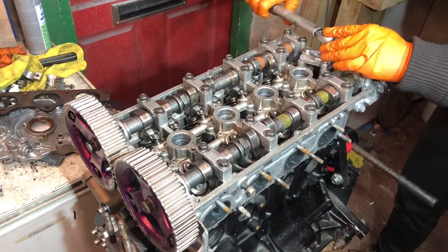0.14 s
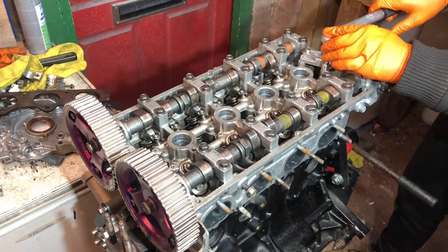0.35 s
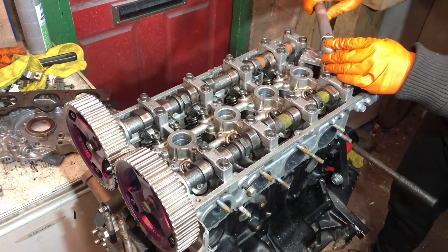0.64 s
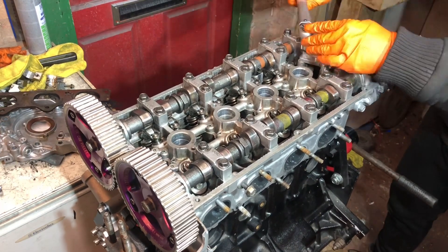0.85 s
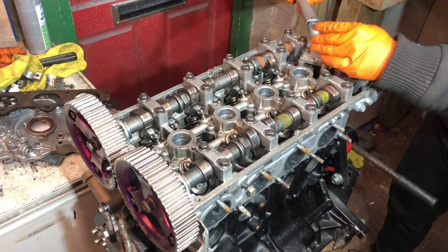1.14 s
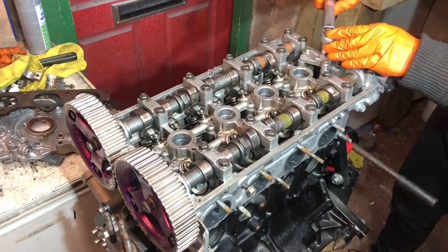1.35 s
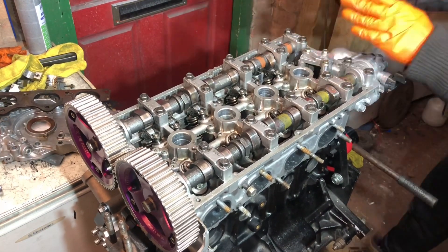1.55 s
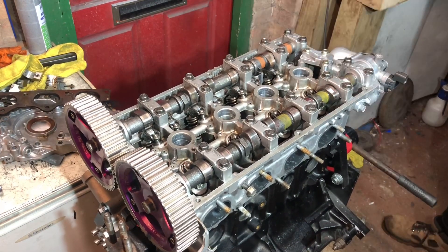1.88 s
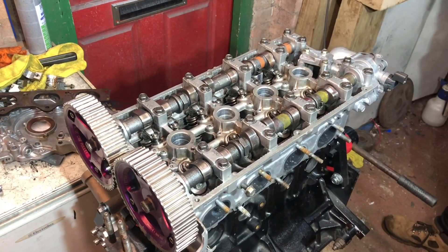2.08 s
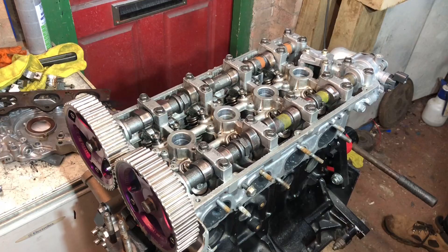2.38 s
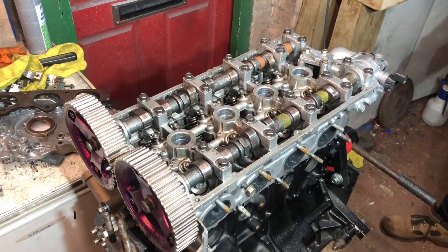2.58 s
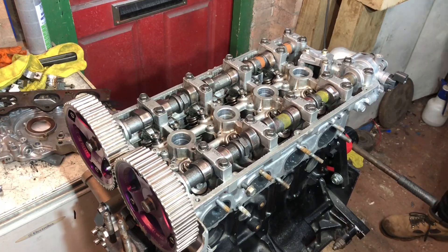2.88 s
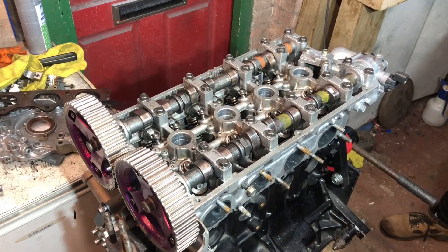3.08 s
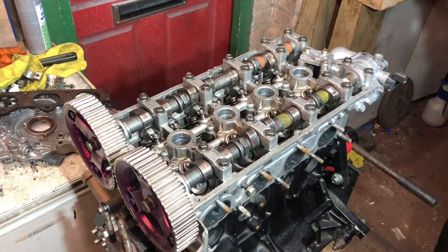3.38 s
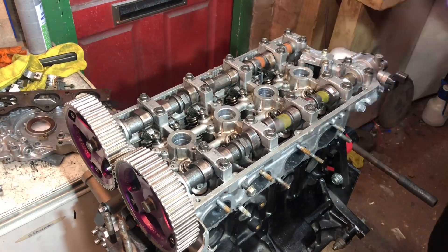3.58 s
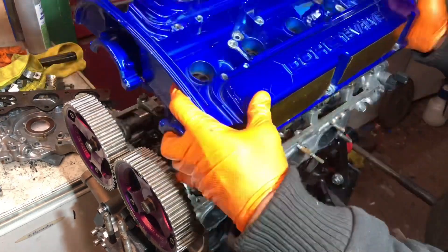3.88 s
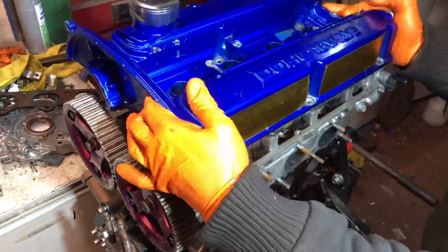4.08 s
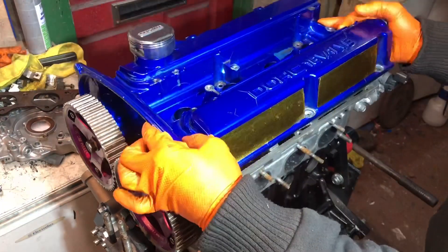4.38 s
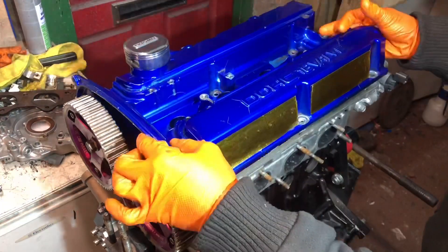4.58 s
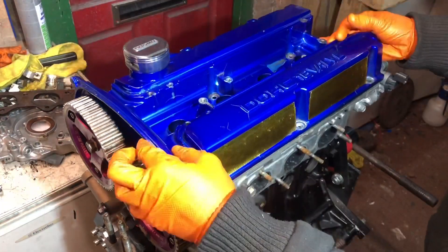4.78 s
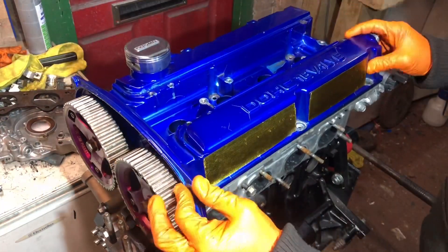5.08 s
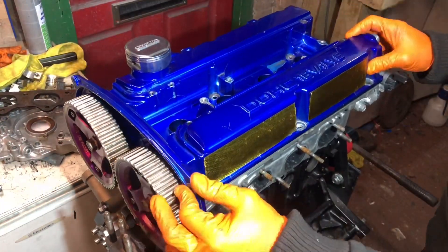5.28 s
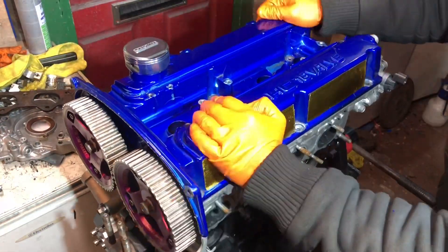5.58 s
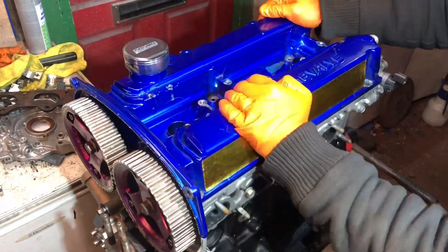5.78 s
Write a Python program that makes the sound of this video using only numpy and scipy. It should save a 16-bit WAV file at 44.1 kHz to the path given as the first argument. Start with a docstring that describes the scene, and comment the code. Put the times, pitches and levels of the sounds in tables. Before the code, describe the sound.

Close mono pickup in a small cluttered workshop. A ratchet wrench clicks in light pairs, then is laid down with a bright steel clink; other tools knock and scrape briefly on wood. Sleeves and rubber gloves rustle, and a hollow aluminium cover lands on the engine with a loud clack and quick rocking rattles. Faint rubs and soft dull taps follow over low hum.

```python
"""Wrench and cam cover in a small workshop

A wrench ticks on the bolts of a cylinder head, is laid down with a clink, and other tools are pushed aside.
Sleeves and rubber gloves rustle as a cast aluminium cam cover is picked up; it clacks onto the head, rocks
and is nudged home with dull knocks. Behind it all is a faint steady room noise with a low hum.
Blows are short cracks plus fading tones; rubbing, dragging and room noise are random noise given a colour.
"""
import sys
import numpy as np
from scipy import signal
from scipy.fft import rfft, irfft, next_fast_len
from scipy.io import wavfile

SR = 44100
rng = np.random.default_rng(int(sys.argv[2]) if len(sys.argv) > 2 else 0)


def master_out(mix):
    """Clip the mix to full scale and print it as 16-bit PCM to the path in sys.argv[1]."""
    frames = np.transpose(np.atleast_2d(mix))
    ceiling = np.clip(frames, -1, 1)
    pcm = np.round(ceiling * 32767).astype(np.int16)
    wavfile.write(sys.argv[1], SR, pcm)


N = 261954
TAIL = np.arange(2 ** 13) / SR   # time axis of every blow and of the room's tail, in seconds

# Back swings of the ratchet, two pawl clicks each: start_s, gap_to_second_click_s, level_db
RATCHET_SWINGS = [(.292, .056, -43.5), (0.6756, 0.047, -42.5), (1.0327, .0431, -46), (1.4101, 0.041, -43.5)]
PAWL_TILT = 0.13   # dB per octave
PAWL_RING_DB, SECOND_RING_DB = -5.5, -9.5   # ring of the handle on the first and second click
SETTLE_S, SETTLE_DB = 0.035, -10.5   # the pawl settles after the second click, at a level against it
# The socket jolts on the bolt as the hand turns round: start_s, level_db, brightness_db_per_octave
SOCKET_JOLTS = [(0.0509, -43, -0.5), (.063, -41, 0.3), (.473, -44, 0), (.535, -51, 4), (.5531, -45.5, 7.5),
                (0.8265, -44, 3.5), (.908, -37.5, 3.5), (1.1731, -45, 1.5), (1.3114, -45, -0.7),
                (1.575, -51.5, 1.5)]
JOLT_RING_DB = -27.5
REBOUND_S, REBOUND_DB = 0.019, -16.5   # each jolt rebounds once: delay, and level against the jolt
# A quick zip of thin ticks, the ratchet running or a glove rubbing:
# start, spacing, level, brightness in dB per octave
ZIP_S, ZIP_STEP_S, ZIP_DB, ZIP_TILT = 1.664, 0.0097, -46.5, 12


def wrench_ticks(count=4):
    """Every tick, the zip's included, as (start_s, level_db, brightness_db_per_octave, handle_ring_db)."""
    ticks = [(ZIP_S + k * ZIP_STEP_S, ZIP_DB, ZIP_TILT, JOLT_RING_DB) for k in range(count)]
    for start_s, gap_s, db in RATCHET_SWINGS:
        second_s = start_s + gap_s
        ticks.append((start_s, db, PAWL_TILT, PAWL_RING_DB))
        ticks.append((second_s, db, PAWL_TILT, SECOND_RING_DB))
        ticks.append((second_s + SETTLE_S, db + SETTLE_DB, PAWL_TILT, JOLT_RING_DB))
    for start_s, db, tilt in SOCKET_JOLTS:
        ticks.append((start_s, db, tilt, JOLT_RING_DB))
        ticks.append((start_s + REBOUND_S, db + REBOUND_DB, tilt, JOLT_RING_DB))
    return ticks


# Ringing tones of the wrench, levels against each other: pitch_hz, level_db, time_to_fall_60_db_s
WRENCH_TONES = [(1496, 8, 0.054), (1527, -2.5, 0.067), (2028, 6.5, 0.038), (2260, -4, 0.066),
                (4820, -2.5, 0.023), (6630, -12, 0.036), (8400, -19, 0.052), (11100, 4.5, .04)]
# Colour of the wrench's contacts and dense higher tones: pitch_hz, relative_level_db_per_hz
WRENCH_COLOUR = [(70, -30), (250, -9), (750, -8), (1400, -5), (2800, -9), (4000, -7), (5000, -2),
                 (6500, -4), (8500, -1), (10500, 4), (13000, 0), (16000, -1)]
# Colour of the hands' handling noise: pitch_hz, relative_level_db_per_hz
HANDS_COLOUR = [(40, -16), (120, 3.5), (260, 2.5), (900, -2), (2500, -18.5), (16000, -39)]
# Dull bump of the hands at every jolt: level against the jolt, dB per octave, contact in seconds
BUMP_DB, BUMP_TILT, BUMP_CONTACT_S = -18, -5.5, 0.0093
WORK_START_S, WORK_END_S = 0.0, 1.7


def wrench():
    """Small bright ticks of the wrench on the bolts, over the dull bumping of the hands that work it."""
    out = np.zeros(N)
    for start_s, db, tilt, ring_db in wrench_ticks():
        crack = knock(WRENCH_COLOUR, tilt, crack_db=-8, t60=0.065, damping=0.13)
        tick = crack + from_db(ring_db) * ring(WRENCH_TONES)
        add(out, start_s, db, grate(tick, contact_s=0.000062))
    for start_s, db, _ in SOCKET_JOLTS:
        bump = knock(TOOL_COLOUR, BUMP_TILT, crack_db=-8.5, t60=0.13, damping=0.46)
        add(out, start_s, db + BUMP_DB, grate(bump, BUMP_CONTACT_S))
    # the level of the handling wanders quickly
    effort = movement(WORK_START_S, WORK_END_S) * from_db(-76.5 + 5.3 * drift(30.5))
    handling = steady(colour(rng.standard_normal(N), HANDS_COLOUR)) * effort
    return from_db(1.56) * in_room(out + handling, wet_db=-19.5)


# Ringing tones of the steel tools, levels against each other: pitch_hz, level_db, time_to_fall_60_db_s
STEEL_TONES = [(4620, 12.5, 0.045), (5440, 4, 0.022), (6130, 4, 0.043), (6800, -14, 0.098),
               (8700, -14, 0.051), (9080, 2.5, 0.13), (10600, -28, 0.018), (13650, 3, 0.079)]
# Hollow, woody ring of the knocks, levels against each other: pitch_hz, level_db, time_to_fall_60_db_s
BOARD_TONES = [(576, -7.5, .08), (703, -1, 0.098), (789, -1.5, 0.044), (966, -2, 0.11), (1042, -3.5, 0.06),
               (1196, -3, 0.066), (1470, 1, 0.092), (2163, -5.5, 0.064), (2940, -2.5, 0.056),
               (3122, -1, 0.061)]
# Colour of the dull contacts and dense higher tones: pitch_hz, relative_level_db_per_hz
TOOL_COLOUR = [(70, -40), (130, -23), (240, -7), (380, -10), (520, -5), (800, -1), (1400, 0), (2200, -4),
               (3100, -2), (4200, -6), (6300, -6), (10000, -11), (16000, -21)]


def dull_blow(tilt, steel_db, board_db, contact_s):
    """One contact: a dull knock with a steely ring and a hollow, woody one."""
    rings = from_db(steel_db) * ring(STEEL_TONES) + from_db(board_db) * ring(BOARD_TONES)
    dull_knock = knock(TOOL_COLOUR, tilt, crack_db=-4.5, t60=0.072, damping=0.21)
    return grate(dull_knock + rings, contact_s)


# Steel meets steel: start_s, level_db, brightness_db_per_octave, contact_s
STEEL_CLINKS = [(1.861, -26.5, 7.5, 0.00054), (2.047, -39, -1, 0.008), (2.495, -49, 1, .01),
                (2.6795, -34.5, 2, 0.0045)]
# Dull knocks of tools shifted and set down, and (from 3.5 s on) of the cover being nudged:
# start_s, level_db, brightness_db_per_octave, board_ring_db, contact_s
DULL_KNOCKS = [(1.865, -47.5, -11, -22, 0.0018), (1.886, -35, 0.5, -28, .0042),
               (1.917, -45, -4.5, -10, .008), (1.947, -42.5, 0, -15, 0.0022), (1.962, -42.5, -3, 1, 0.0039),
               (2.068, -44.5, -2, -9, 0.0059), (2.125, -43.5, 4.5, -5, .012),
               (2.142, -42.5, -6.5, -7.5, 0.0046), (2.163, -47.5, -2, 0, 0.0041),
               (2.659, -35.5, .5, -6.5, 0.0048), (2.6993, -30.5, 0, 3.5, 0.0012),
               (2.706, -34, 0, -1.5, .0028), (3.537, -51.5, -12.5, -12, 0.003),
               (3.665, -45.5, -4.5, -12, 0.0061), (5.253, -57, -1.5, -11, 0.0019),
               (5.343, -42.5, -2.1, -12, .00093), (5.798, -50, -2.5, -8, 0.0017)]


def clinks_and_knocks():
    """Steel clinks, and dull knocks of tools shifted and set down and of the cover being nudged."""
    out = np.zeros(N)
    for start_s, db, tilt, contact_s in STEEL_CLINKS:
        add(out, start_s, db, dull_blow(tilt, -7.5, -19, contact_s))
    for start_s, db, tilt, board_db, contact_s in DULL_KNOCKS:
        add(out, start_s, db, dull_blow(tilt, -25, board_db, contact_s))
    return from_db(0.5) * in_room(out, wet_db=-18.5)


# Tools dragged over the bench: start_s, end_s, level_db
TOOL_DRAGS = [(1.886, 1.98, -62), (2.05, 2.186, -59), (2.5, 2.62, -64.5), (2.664, 2.734, -56.5),
              (3.293, 3.385, -65.5)]


def drags():
    """Steel dragged over wood: rough friction that sets the board ringing."""
    effort = sum(from_db(db) * movement(start_s, end_s) for start_s, end_s, db in TOOL_DRAGS)
    slips = rng.standard_normal(N) * from_db(6.0 * drift(300))
    friction = unit(colour(slips, TOOL_COLOUR, tilt=-2.3))
    board = unit(signal.fftconvolve(slips, ring(BOARD_TONES))[:N])
    scrape = friction + from_db(-6) * board
    return in_room(steady(scrape) * effort, wet_db=-17)


# Cover against the head: start_s, level_db, brightness_db_per_octave
COVER_CLACKS = [(4.3378, -39, 7), (4.339, -40, -12.5), (4.4119, -38.5, 2.5), (4.4249, -28.5, -0.5),
                (4.4347, -13.5, .5), (4.4418, -22.5, .5), (4.487, -33, -9), (4.4914, -40.5, 5),
                (4.4957, -31, -5.5), (4.506, -35.5, -0.5), (4.526, -29, -5.5), (4.590, -46.5, -3),
                (4.596, -47, 6.5), (4.606, -49, 6)]
# Ringing tones of the cover, levels against each other: pitch_hz, level_db, time_to_fall_60_db_s
COVER_TONES = [(818, -17, .1), (1008, -10, .16), (1105, -9, .12), (1178, -8, .08), (1533, -7.5, .08),
               (1583, -9, .075), (1675, -2, .07), (1815, -6, .055), (1948, -.5, .06), (2112, 3, .07),
               (2235, 0, .06), (2325, -4, .05), (2505, -2, .07), (2670, -3, .065), (2777, -8, .06),
               (3107, -8, .06), (3213, 0, .055), (3369, -1.5, .06), (3485, -3, .05), (4460, -7, .05),
               (4753, -15, .065), (5160, -6, .045)]
# Colour of the cover's contacts and dense higher tones: pitch_hz, relative_level_db_per_hz
COVER_COLOUR = [(70, -50), (130, -33), (450, -29), (750, -13), (1080, -.5), (1350, -6.5), (1650, 2),
                (2200, -.5), (2750, -5), (3300, 2), (3900, -16), (5000, -8.5), (6700, -23), (8000, -20),
                (9900, -12.5), (11000, -20.5), (16000, -31)]
# Boom of the engine and its stand, level against each blow: pitch_hz, level_db, time_to_fall_60_db_s
STAND_TONES = [(133, -50, 0.51), (214, -45, 0.54), (375, -52, .6)]
COVER_LOW_HZ = 450   # the shell radiates little below this


def cover():
    """The hollow casting touches, drops and rocks on the head; the engine booms faintly under it."""
    out, blows = np.zeros(N), np.zeros(N)
    for start_s, db, tilt in COVER_CLACKS:
        crack = knock(COVER_COLOUR, tilt, crack_db=2.5, t60=0.06, damping=0.2)
        clack = crack + from_db(-2) * ring(COVER_TONES, tilt)
        add(out, start_s, db, grate(clack, contact_s=0.00073))
        blows[round(start_s * SR)] = from_db(db)
    shell = signal.sosfilt(signal.butter(1, COVER_LOW_HZ, "high", fs=SR, output="sos"), out)
    t = np.arange(SR) / SR
    boom = sum(from_db(db - 60 * t / t60) * np.sin(2 * np.pi * hz * t) for hz, db, t60 in STAND_TONES)
    return from_db(0.92) * in_room(shell, wet_db=-31.5) + signal.fftconvolve(blows, boom)[:N]


# The arms move, sleeves rustling: start_s, end_s, level_db
ARM_MOVES = [(1.525, 1.866, -72), (2.461, 3.428, -66.5), (3.453, 3.904, -67), (4.74, 5.14, -76),
             (5.298, 5.501, -69.5), (5.631, 5.949, -71)]
# Gloves rub as they take hold or let go: middle_s, level_db, length_s (from the peak down to about 1/7)
GLOVE_RUBS = [(2.573, -70, .04), (2.893, -55.5, 0.0083), (3.048, -58.5, .014), (3.268, -56.5, 0.026),
              (3.34, -54.5, 0.015), (3.367, -56, .012), (3.512, -58.5, 0.029), (3.629, -56, 0.043),
              (3.698, -56, 0.04), (3.731, -46, 0.0088), (3.81, -55.5, 0.015), (3.846, -49.5, 0.011),
              (3.867, -48, 0.0093), (4.698, -60, 0.011), (4.806, -56, .022), (4.855, -59, 0.04),
              (5.321, -57, 0.02), (5.373, -57, 0.01), (5.412, -61, 0.028), (5.636, -59.5, 0.039),
              (5.836, -58.5, .04)]
# Colour of the friction: pitch_hz, relative_level_db_per_hz
CLOTH_COLOUR = [(100, -33), (700, -10), (1200, -1.5), (2000, -8.5), (4000, -4), (6500, -5), (9500, -5),
                (13000, -7), (16000, -11)]
RESTING_DB = -77.5   # the sleeves never quite rest


def rustle():
    """Cloth and rubber slide: a soft uneven hiss with stray catches, and single rubs that swell and fade."""
    catches = (rng.random(N) < 100 / SR) * rng.standard_normal(N)   # about 100 a second
    snags = unit(signal.fftconvolve(catches, dying_noise(0.02, damping=0.1))[:N])
    friction = unit(rng.standard_normal(N)) + from_db(-2) * snags
    moves = sum(from_db(db) * movement(start_s, end_s) for start_s, end_s, db in ARM_MOVES)
    effort = from_db(RESTING_DB) + moves
    unevenness = from_db(-2.5 + 3.7 * drift(50))
    out = steady(colour(friction, CLOTH_COLOUR)) * effort * unevenness
    for middle_s, db, length_s in GLOVE_RUBS:
        t = np.arange(-2 * length_s, 2 * length_s, 1 / SR)
        grain = rng.standard_normal(len(t)) * from_db(3.5 * drift(400, size=len(t)))
        swell = np.exp(-2 * (t / length_s) ** 2)
        rub = steady(colour(grain, CLOTH_COLOUR, tilt=2.5)) * swell
        at = round((middle_s + t[0]) * SR)
        out[at:at + len(t)] += from_db(db) * rub[:N - at]
    return in_room(out, wet_db=-14.0)


# Colour of the workshop at rest: pitch_hz, relative_level_db_per_hz
AIR_COLOUR = [(18, -77.5), (30, -47), (86, -34.5), (124, -12.5), (199, -12.5), (311, -13.5), (374, -4.5),
              (426, -8.5), (499, -10), (844, -12.5), (1430, -17), (5170, -27), (6210, -27), (7870, -34),
              (16000, -32.5)]
# Hum of the workshop, each tone wavering around these: pitch_hz, level_db
HUM_TONES = [(140, -94), (177.6, -93), (258.4, -84), (371.4, -80)]


def workshop():
    """Steady room noise, and a hum whose tones waver in pitch and level."""
    out = steady(colour(rng.standard_normal(N), AIR_COLOUR)) * from_db(-67.5)
    for hz, db in HUM_TONES:
        level = from_db(db + 3 * drift(14)) * np.sqrt(2)
        phase = 2 * np.pi * np.cumsum(hz + 2 * drift(26)) / SR
        out += level * np.sin(phase)
    return out


# Colour of the room's tail: pitch_hz, relative_level_db_per_hz
ROOM_COLOUR = [(80, -5), (300, -1), (1000, -1), (4000, -3.5), (16000, -1)]


def in_room(x, wet_db):
    """The cluttered workshop adds a short tail, cut off where TAIL ends."""
    tail = colour(dying_noise(t60=0.76, damping=0.2), ROOM_COLOUR)
    return x + from_db(wet_db) * signal.fftconvolve(x, tail)[:N]


def knock(spectrum, tilt, crack_db, t60, damping):
    """A crack followed by dense tones that die fast, made as fading noise."""
    crack = unit(colour(signal.unit_impulse(len(TAIL)), spectrum, tilt))
    dense_tones = unit(colour(dying_noise(t60, damping), spectrum, tilt))
    return unit(from_db(crack_db) * crack + dense_tones)


def ring(modes, tilt=0):
    """Clear fading tones; where the blow lands, drawn by chance, sets the strength and sign of each."""
    hz, db, t60 = np.transpose(modes)[:, :, None]
    sign = rng.choice([-1, 1], hz.shape)
    strength = from_db(db + tilt * np.log2(hz) + 2 * rng.standard_normal(hz.shape)) * sign
    fade = np.exp(-np.log(1000) * TAIL / t60)
    motion = np.sum(strength * np.sin(2 * np.pi * hz * TAIL) * fade, axis=0)
    # little is radiated below the lowest tone
    return unit(signal.sosfilt(signal.butter(2, 0.8 * hz.min(), "high", fs=SR, output="sos"), motion))


def grate(sound, contact_s):
    """A long contact is a swell of tiny slips; a short one is nearly a single touch."""
    age = TAIL / max(contact_s, 1e-4)
    slips = unit(rng.standard_normal(len(TAIL)) * np.sqrt(age) * np.exp(-1.4 * age))
    contact = signal.unit_impulse(len(TAIL)) + slips * contact_s / 0.0012
    return unit(signal.fftconvolve(sound, contact)[:len(TAIL)])


def add(out, start_s, db, sound):
    """Place a blow; its level is its energy spread over 5 ms."""
    at = round(start_s * SR)
    out[at:at + len(sound)] += from_db(db) * np.sqrt(0.005 * SR) * sound[:N - at]


def movement(start_s, end_s, ease_s=0.036):
    """Gain that eases in, holds and eases out; it is halfway up at the start and at the end."""
    t = np.arange(N) / SR
    return np.clip(0.5 + np.minimum(t - start_s, end_s - t) / ease_s, 0, 1)


def drift(rate, size=N):
    """Slow chance with a spread of about one, drawn at a rate per second and joined by straight lines."""
    knots = rng.standard_normal(int(size / SR * rate) + 2)
    return np.interp(np.arange(size) / SR * rate, np.arange(len(knots)), knots)


def dying_noise(t60, damping):
    """Octave bands of noise that die away; t60 holds at 2 kHz, and the highs go sooner."""
    white = rfft(rng.standard_normal(len(TAIL)))
    octave = np.log2(np.clip(np.arange(len(white)) / TAIL[-1], 125, 16000) / 2000)
    out = np.zeros(len(TAIL))
    for k in range(-4, 4):   # octaves from 2 kHz
        band = irfft(white * np.maximum(1 - abs(octave - k), 0))
        out += band * from_db(-60 * TAIL / t60 * 2 ** (k * damping))
    return unit(out)


def colour(x, spectrum, tilt=0):
    """Causal (minimum-phase) filter that follows a spectrum, tilted in dB per octave above 512 Hz."""
    size = next_fast_len(len(x))
    octave = np.log2(np.maximum(np.arange(size // 2 + 1) * SR / size, 20))
    hz, db = np.transpose(spectrum)
    slope = tilt * np.maximum(octave - 9, 0)
    gain = from_db(np.interp(octave, np.log2(hz), db) + slope)
    # folding the cepstrum forward in time gives the filter no response before its input
    cepstrum = irfft(np.log(gain), size)
    cepstrum[1:size // 2] *= 2
    cepstrum[size // 2:] = 0
    return irfft(rfft(x, size) * np.exp(rfft(cepstrum)), size)[:len(x)]


def from_db(db):
    """Decibels to a plain gain."""
    return 10 ** (np.asarray(db) / 20)


def unit(x):
    """Scale to an energy of one."""
    return x / np.sqrt(np.sum(x ** 2) + 1e-20)


def steady(x):
    """Scale a lasting sound to an average (rms) level of one."""
    return np.sqrt(len(x)) * unit(x)


def scene():
    """All the sources together, as one channel."""
    return (wrench() + clinks_and_knocks() + drags() + cover() + rustle() + workshop())[None]


def record(dry):
    """The microphone drops the deep bass; the top is cut above 16 kHz."""
    thin = signal.sosfilt(signal.butter(2, 70, "high", fs=SR, output="sos"), dry)
    return signal.sosfilt(signal.ellip(10, 0.2, 70, 16000, fs=SR, output="sos"), thin)


dry = scene()
out = record(dry)
master_out(out)
```